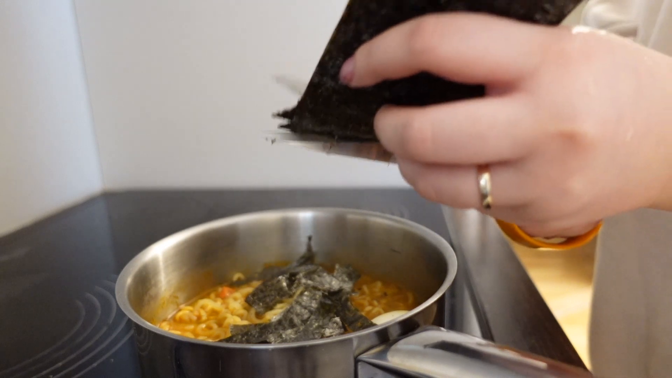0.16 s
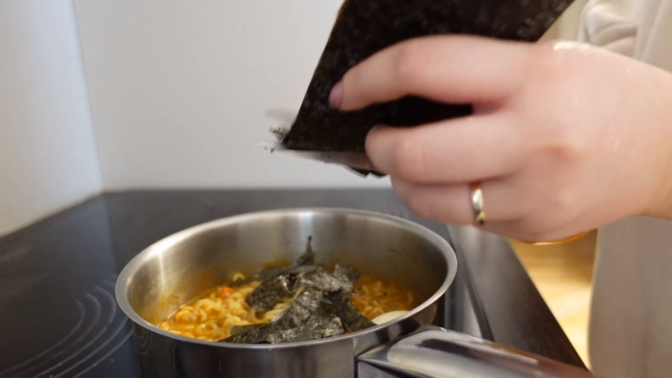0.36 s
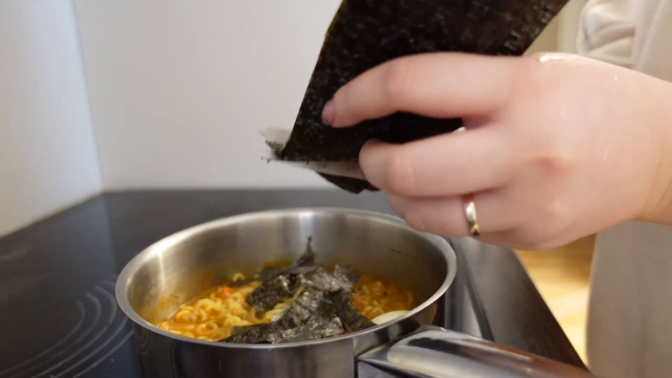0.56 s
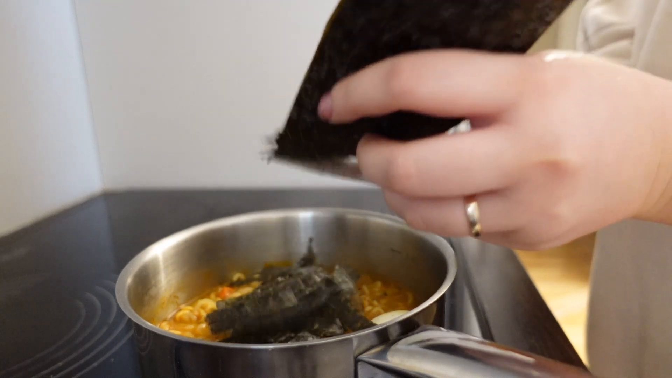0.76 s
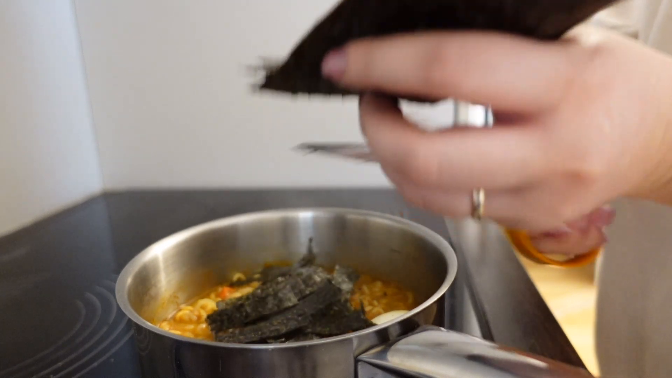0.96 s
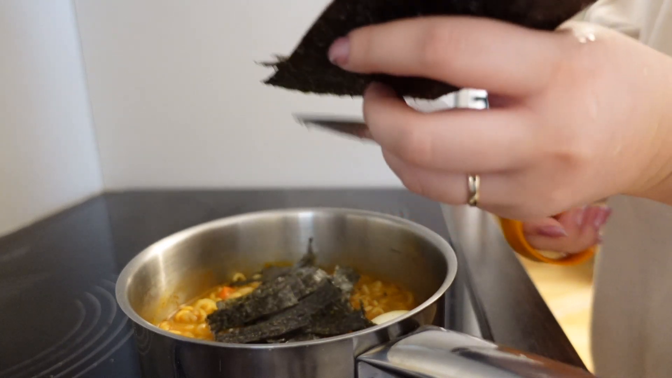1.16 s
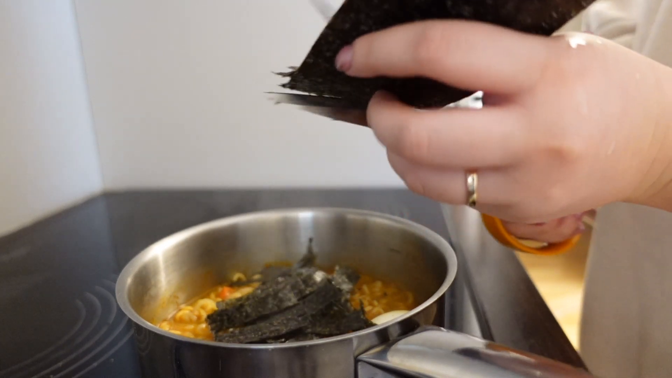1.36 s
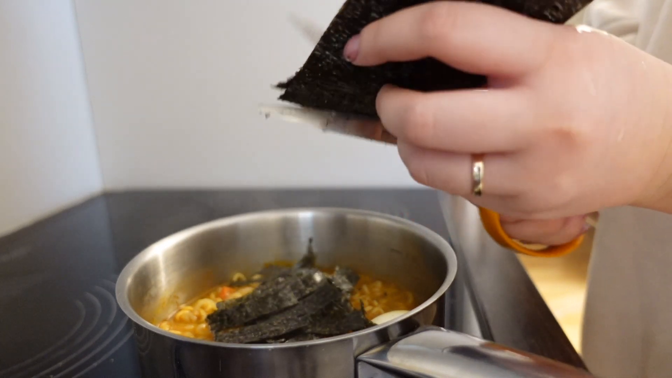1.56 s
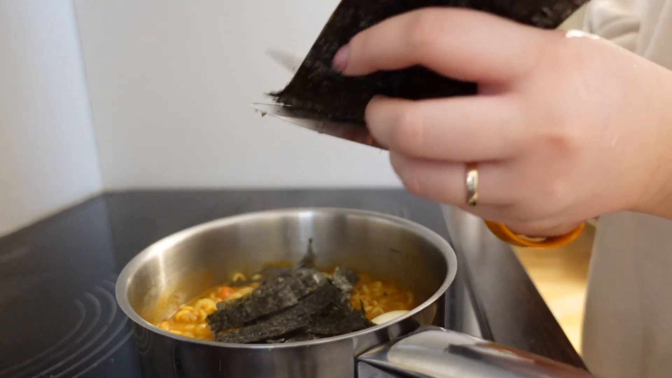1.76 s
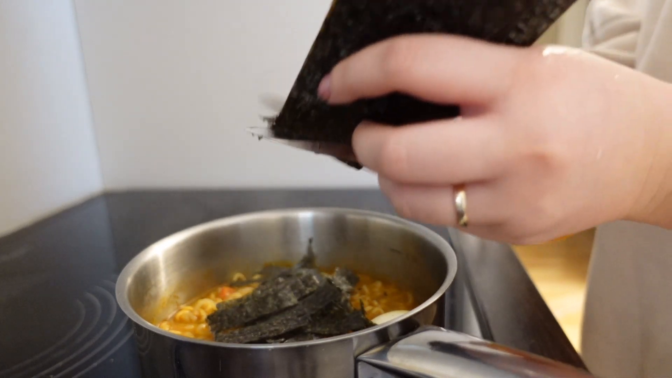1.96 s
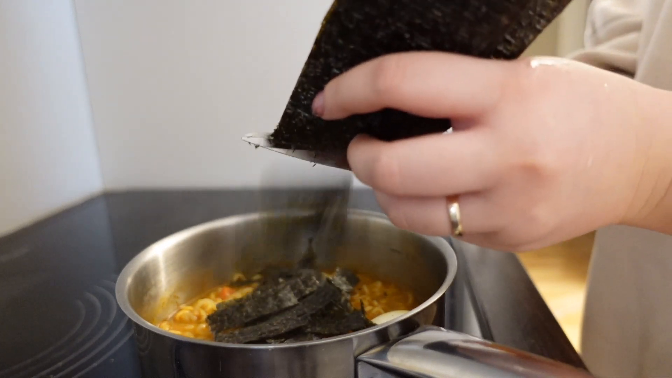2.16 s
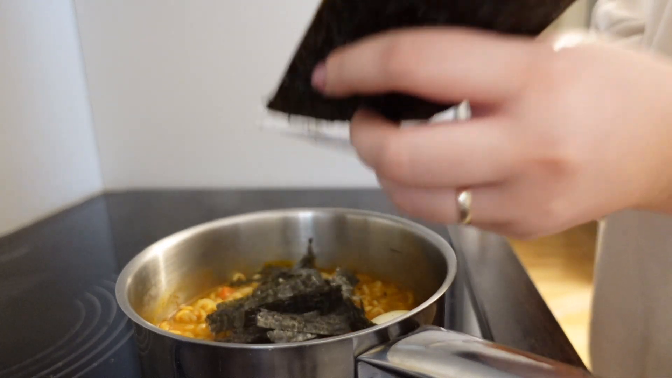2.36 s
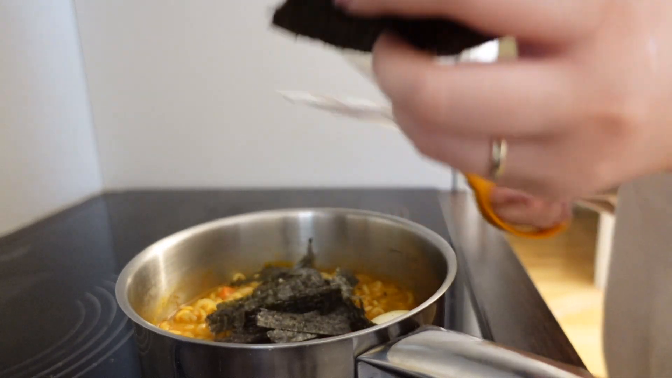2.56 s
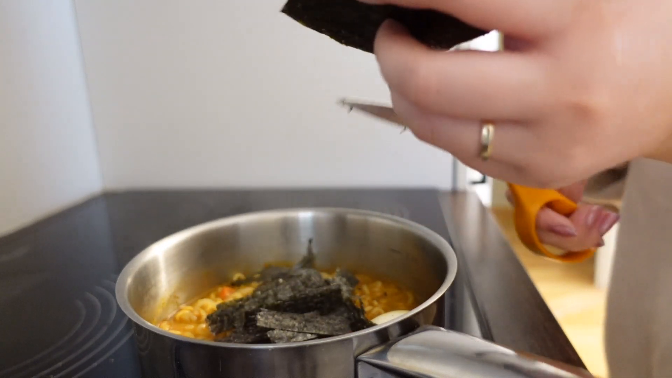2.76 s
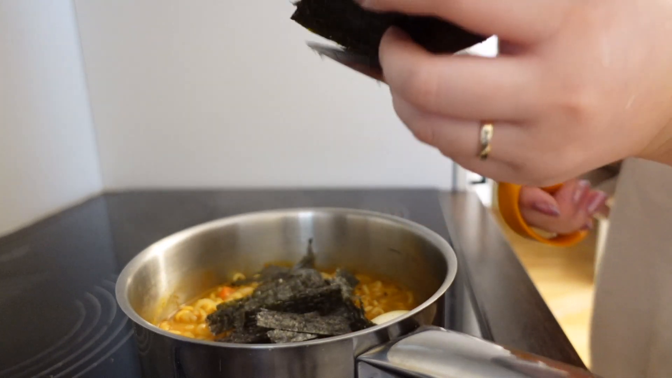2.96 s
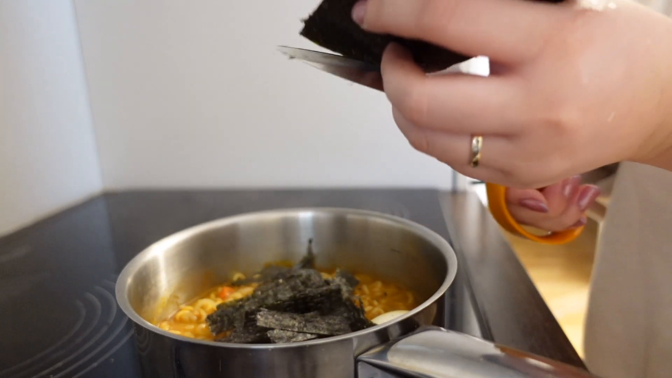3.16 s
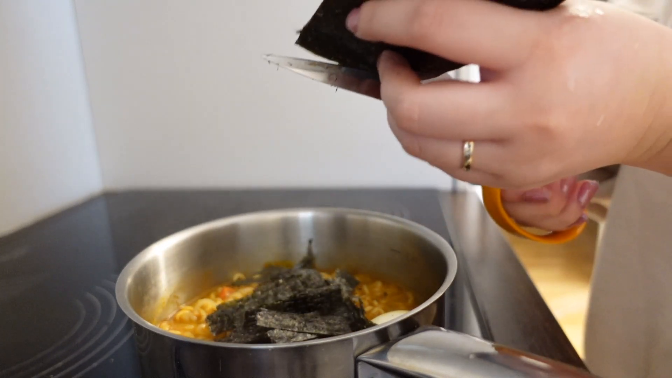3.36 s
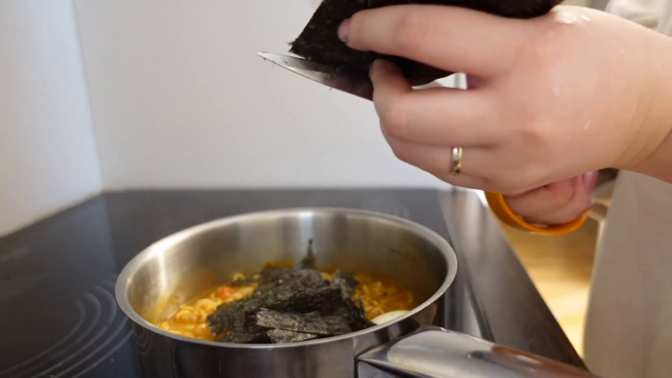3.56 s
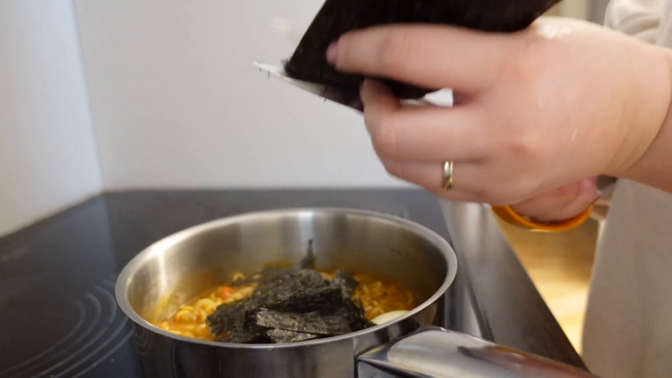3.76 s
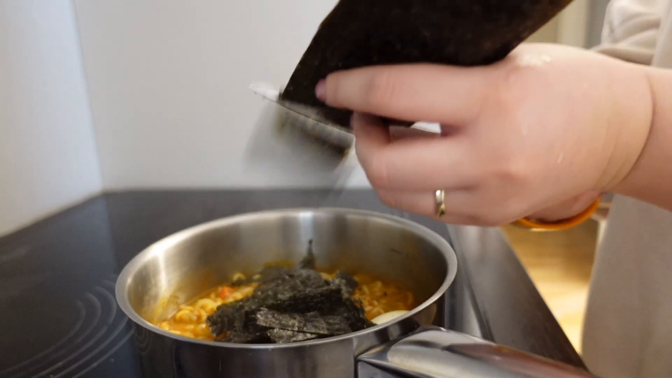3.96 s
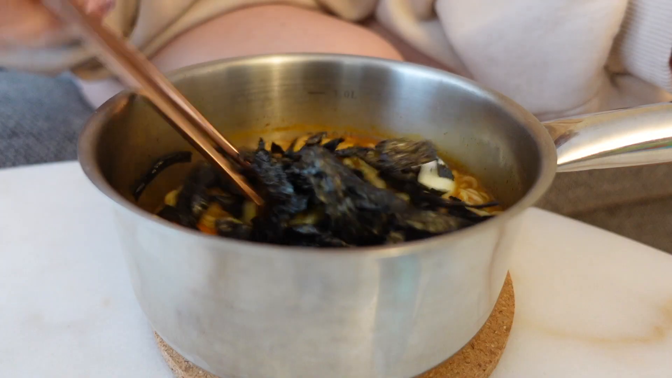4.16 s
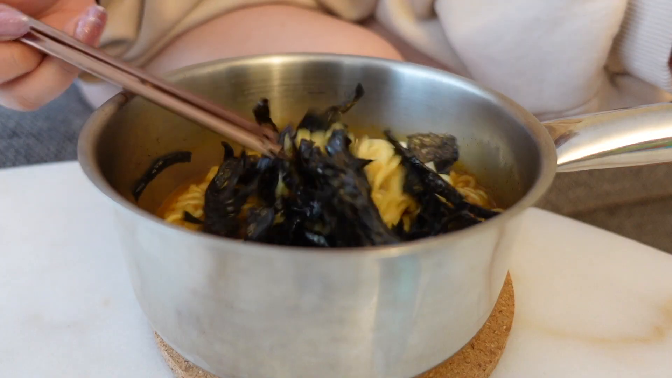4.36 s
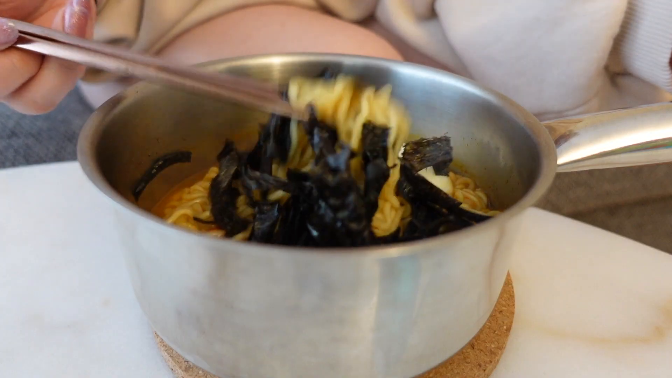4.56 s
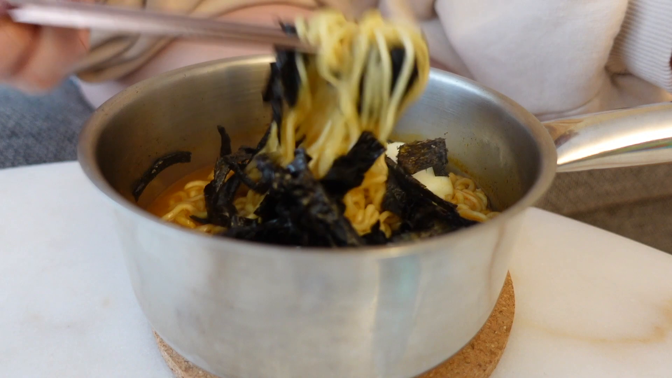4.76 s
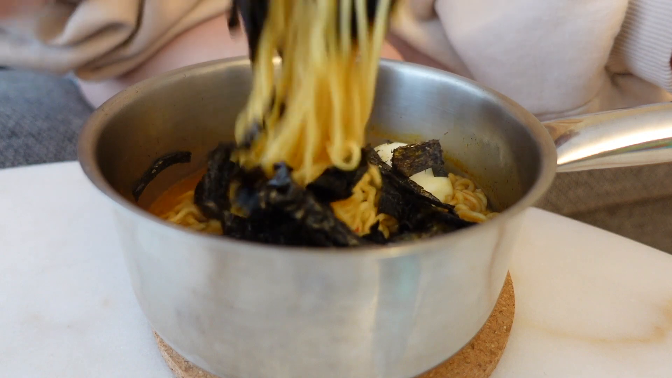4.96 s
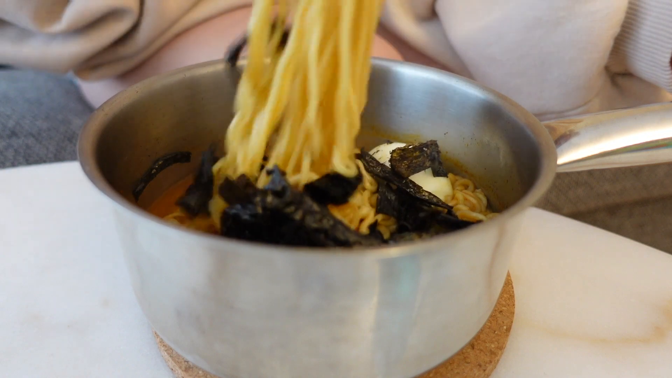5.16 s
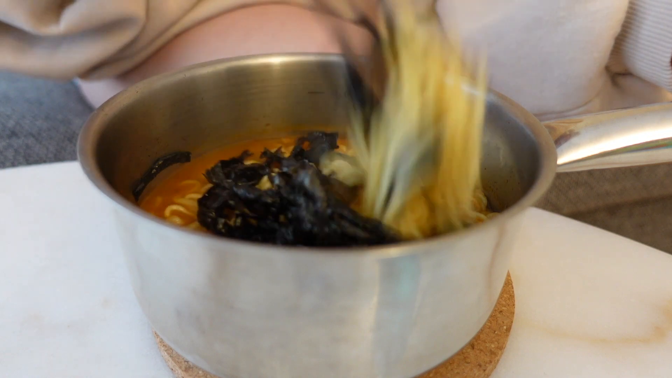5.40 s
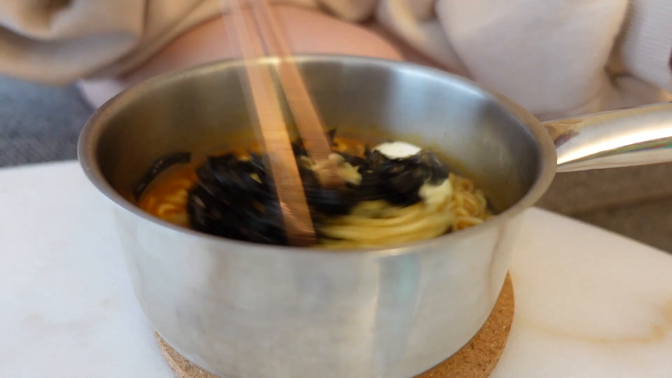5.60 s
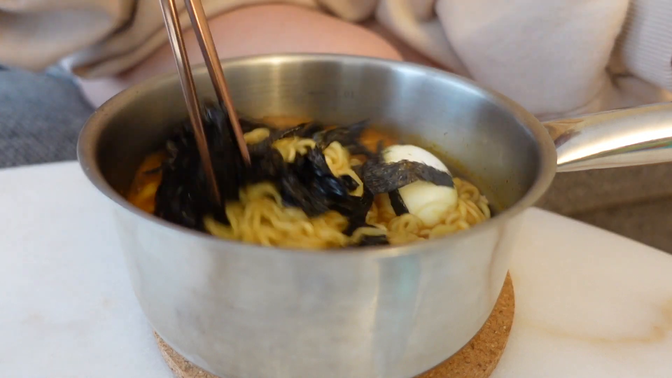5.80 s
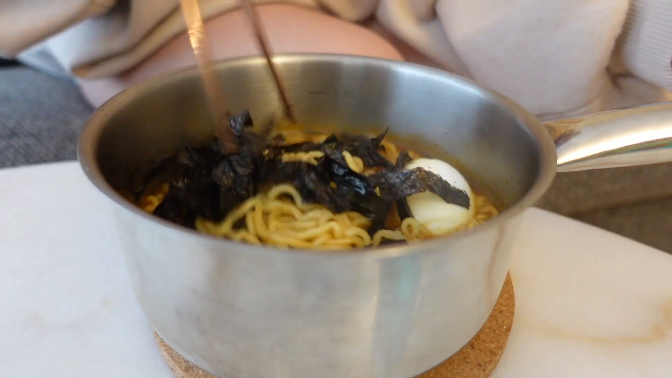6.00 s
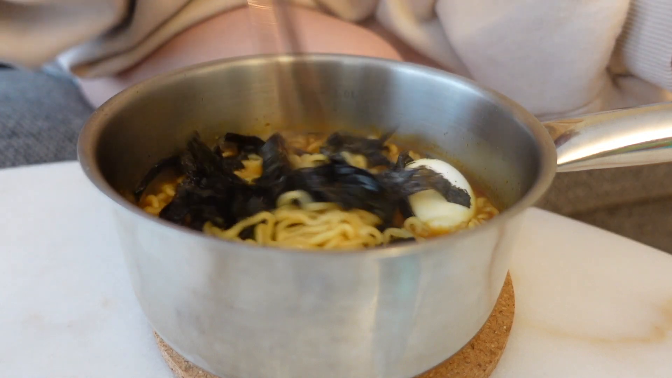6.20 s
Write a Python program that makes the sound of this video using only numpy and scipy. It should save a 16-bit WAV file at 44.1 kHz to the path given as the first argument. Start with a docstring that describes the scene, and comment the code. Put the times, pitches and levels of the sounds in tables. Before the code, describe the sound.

Scissors cut a crisp sheet of dried seaweed in three crackling strokes, then an abrupt change to wet noodles stirred with chopsticks in a steel pot.

```python
"""A fan-toned room noise and a hum come first, as a sheet of dried seaweed rustles in the hand in a small kitchen.
Scissors cut it in three strokes close to the microphone: avalanches of tiny fractures and single brittle snaps,
with stick-slip scrapes and rustling between strokes. At 4.12 s the scene changes abruptly to a table:
wet noodles slide as streams of resonant grains and part in ticks, chopsticks clink on a steel pot that rings
in its modes, and bubbles gulp and pop as damped sines. Scattered echoes and a faint tail surround both places."""
import sys
import numpy as np
from scipy import signal
from scipy.fft import rfft, irfft
from scipy.io import wavfile
from scipy.ndimage import uniform_filter1d

SR = 44100
rng = np.random.default_rng(int(sys.argv[2]) if len(sys.argv) > 2 else 0)


def wav_record(signal):
    """Record a signal, one row per channel, as 16-bit PCM in the file named by sys.argv[1]."""
    frames = np.transpose(np.atleast_2d(signal))
    bounded = np.clip(frames, -1, 1)
    # unit amplitude maps onto the largest positive 16-bit level
    quanta = np.round(bounded * 32767).astype(np.int16)
    wavfile.write(sys.argv[1], SR, quanta)


N = 275007
TIME = np.arange(N) / SR
BINS = np.fft.rfftfreq(1024, 1 / SR)


def amp(db):
    """Logarithmic level: decibels to amplitude gain."""
    return 10 ** (np.asarray(db) / 20)


def evened(x):
    """Normalization of power: scales to rms 1."""
    return x / np.sqrt(np.mean(x ** 2) + 1e-20)


def read(points, hz):
    """Logarithmic pitch scale: interpolates a spectrum or other curve over log frequency."""
    f, value = np.transpose(points)
    return np.interp(np.log(hz + 1), np.log(f + 1), value)


def add(mix, s, sound):
    """Superposition: mixes a sound in at time s."""
    part = mix[max(round(s * SR), 0):][:len(sound)]
    part += sound[:len(part)]


def humps(modes, hz):
    """Resonance: broad modes as bumps in dB."""
    return sum(db / (1 + (2 * (hz - f) / width) ** 2) for f, width, db in modes)


def shelves(body_db, edge_db, body_hz=2400, edge_hz=7000):
    """Spectral tilt: lifts the low end (body) and the high end (edge) of a spectrum, in dB."""
    body = body_db / (1 + (BINS / body_hz) ** 4)
    edge = edge_db / (1 + (edge_hz / (BINS + 1)) ** 4)
    return body + edge


def ripple(size=14):
    """Individual resonance: random peaks and dips, since every flake has resonances of its own."""
    return evened(uniform_filter1d(rng.standard_normal(len(BINS)), size))


def impulse(db):
    """Minimum phase: the causal click of energy 1 whose spectrum has this shape."""
    log_gain = np.log(amp(np.r_[db, db[-2:0:-1]]))
    click = np.fft.ifft(np.exp(np.conj(signal.hilbert(log_gain)))).real
    return click / np.linalg.norm(click)


def crackle(count, per_s, spread_db):
    """Crackling noise: random clicks of rms 1, many small and a few large."""
    size = amp(spread_db * np.minimum(rng.exponential(1, count), 4))
    sign = rng.choice([-1, 1], count)
    happens = rng.random(count) < per_s / SR
    return evened(size * sign * happens)


# likeness of the left and right room noise: hz (Hz), correlation (0 to 1)
AIR_LIKENESS = [(30, 0.67), (100, 0.74), (250, 0.63), (1000, 0.61), (4000, 0.56), (16000, 1)]


def air(colour, db, drone):
    """Partly coherent stationary noise: filtered room noise with the resonance of a distant fan."""
    hz = np.fft.rfftfreq(N, 1 / SR)
    a, b = rfft(rng.standard_normal((2, N)))
    same = np.clip(read(AIR_LIKENESS, hz), -1, 1)
    pair = np.array([a, same * a + np.sqrt(1 - same ** 2) * b])
    gain = amp(read(colour, hz) + humps(drone, hz))
    return amp(db) * evened(irfft(pair * gain, N))


# spectrum of the room noise at the hob: hz (Hz), relative level_db (dB per Hz)
HOB_AIR = [(15, -40.5), (25, -25.5), (102, -2), (293, 3.5), (439, -3), (575, 3.5), (714, -2.5), (1070, 1),
           (1330, -6.5), (2050, -3.5), (2990, -9.5), (5000, -20), (5430, -35.5), (10400, -38),
           (16000, -27.5)]


def hob_air(rms_db=-58):
    """Resonant noise: the air at the hob, with three humps (Hz, width Hz, dB)."""
    return air(HOB_AIR, rms_db, [(191, 50, 4.8), (1090, 130, 5.6), (1680, 200, 8.1)])


def hum(hum_hz=101, rms_db=-76):
    """Pure tone: the steady mains hum."""
    return amp(rms_db) * np.sqrt(2) * np.sin(2 * np.pi * hum_hz * TIME)


# scissor strokes: bite_s (s), through_s (s), rubbing level_db before the rustle mix (dB),
# thin_db, the body the first tears lack (dB), edge_db, their extra edge (dB)
STROKES = [(0.067, 0.648, -34.5, 8, 2), (1.653, 2.16, -33.5, 15, 4.5), (3.564, 3.984, -35, 21.5, 13)]
PRESS_DB_PER_S, EASE_DB_PER_S, SETTLE_DB_PER_S = 139, 20, 47


def pressure():
    """Friction under load: blades rub harder until they bite, ease along the cut, then the sheet settles."""
    gain = np.zeros(N)
    for bite, through, db, *_ in STROKES:
        before, after = np.maximum(bite - TIME, 0), np.maximum(TIME - through, 0)
        along = np.clip(TIME - bite, 0, through - bite)
        gain += amp(db - PRESS_DB_PER_S * before - EASE_DB_PER_S * along - SETTLE_DB_PER_S * after)
    return gain


def level(moves, rise, fade, rest_db):
    """Power addition: hand movements swell, hold and die away above a resting level."""
    power = amp(rest_db) ** 2
    for s, length, db in moves:
        shape = np.clip((TIME - s) / rise, 0, 1) * np.exp(-np.maximum(TIME - s - length, 0) / fade)
        power = power + (amp(db) * shape) ** 2
    return np.sqrt(power)


def rubbing(gain, colour, per_s, spread_db, grain_db, count=12):
    """Granular friction: fine grains, each with a broad resonance, swelling with the movement."""
    out = np.zeros(N)
    for hz in np.geomspace(1800, 12000, count):
        grain = impulse(read(colour, BINS) + humps([(hz, hz / 3, grain_db)], BINS))
        out += signal.oaconvolve(crackle(N, per_s / count, spread_db), grain)[:N]
    return gain * evened(out)


# spectrum of the rubbing sheet: hz (Hz), relative level_db (dB per Hz)
RUB = [(40, -53), (200, -33.5), (900, -12.5), (1700, -6.5), (3000, -5.5), (4500, 2.5), (7000, 0.5),
       (10000, -2.5), (13000, -8.5), (16000, -12)]
# fingers shift their grip: start_s (s), length_s (s), level_db before the rustle mix (dB)
GRIPS = [(.87, 0.024, -43), (1.265, .07, -52.5), (1.385, 0.11, -45.5), (2.52, 0.25, -55),
         (2.71, 0.11, -53.5), (2.98, 0.17, -52), (3.155, 0.092, -45.5), (3.36, 0.045, -50)]
GRIP_RISE_S, GRIP_FADE_S = .025, 0.034
HELD_DB = -65  # the sheet never lies quite still in the hand; before the rustle mix


def rustle(slide_db=-3.0, flakes_db=-7):
    """Friction noise: the sheet hisses on blades and fingers, and brittle flakes crackle on top."""
    gain = np.hypot(pressure(), level(GRIPS, GRIP_RISE_S, GRIP_FADE_S, HELD_DB))
    slide = amp(slide_db) * rubbing(gain, RUB, per_s=9000, spread_db=5.5, grain_db=7)
    flakes = amp(flakes_db) * rubbing(gain, RUB, per_s=90, spread_db=4.2, grain_db=10)
    return slide + flakes


FREE_BODY_DB, FREE_EDGE_DB = 6, -2  # shelves of the last tear of a stroke


def tear_colour(s):
    """Changing radiation: tears are thin and sharp at the bite and fill out as the strip comes free."""
    bite, through, _, thin_db, edge_db = min(STROKES, key=lambda stroke: abs(s - stroke[0]))
    uncut = np.interp(s, [bite, through], [1, 0])
    return shelves(FREE_BODY_DB - thin_db * uncut, FREE_EDGE_DB + edge_db * uncut)


# the sheet gives way under the blades: start_s (s), length_s (s), level_db before the trim in tears (dB)
TEARS = [(0.072, 0.0073, -35), (0.108, 0.004, -23.5), (0.142, 0.023, -19.5), (0.186, 0.004, -22),
         (0.215, 0.0029, -24), (0.237, 0.017, -20.5), (0.3, 0.015, -22), (0.328, 0.008, -22),
         (0.35, 0.016, -21.5), (0.385, 0.014, -26.5), (0.441, 0.0078, -19), (0.476, 0.01, -27),
         (0.495, 0.0044, -22), (0.573, 0.0035, -26.5), (0.629, 0.012, -17.5), (1.692, 0.026, -22),
         (1.731, 0.0076, -19), (1.77, 0.0044, -21), (1.786, 0.0082, -23), (1.837, 0.004, -20),
         (1.897, 0.011, -24.5), (1.925, 0.015, -17.5), (1.972, 0.0048, -18.5), (2, 0.0026, -19),
         (2.031, 0.011, -19), (2.073, 0.0055, -20.5), (2.14, 0.012, -18.5), (3.454, 0.0064, -36),
         (3.587, 0.009, -27.5), (3.612, 0.011, -24), (3.636, 0.013, -22), (3.653, 0.035, -28.5),
         (3.708, 0.017, -21), (3.752, 0.005, -20.5), (3.788, 0.011, -18.5), (3.83, 0.0093, -18),
         (3.859, 0.01, -19.5), (3.928, 0.004, -15.5), (3.944, 0.015, -22.5), (3.971, 0.015, -20.5)]
# spectrum of a fracture in a tear: hz (Hz), relative level_db (dB per Hz)
CRACK = [(30, -67), (120, -44), (250, -35.5), (450, -24), (750, -9), (1500, -8), (2500, -1), (4500, 0),
         (7000, 1), (10000, -3.5), (13000, -8.5), (16000, -14)]
# resonances of sheet and blades: pitch_hz (Hz), width_hz (Hz), lift_db (dB)
SHEET_MODES = [(1019, 150, 3.5), (1566, 160, 4.9), (1810, 390, 3.65), (2720, 390, 4.5), (3700, 500, 2),
               (4210, 320, 2.4), (4950, 460, 4.2), (5880, 410, 2.2)]


def tears(per_s=3800, spread_db=3.5, rise=0.00091, fade=0.0075, flake_db=2.0, gain_db=-0.67):
    """Fracture avalanche: a crack runs through the sheet in tiny breaks, then dies away."""
    out, t = np.zeros(N), np.arange(SR // 10) / SR
    colour = read(CRACK, BINS) + humps(SHEET_MODES, BINS)
    for s, length, db in TEARS:
        shape = (1 - np.exp(-t / rise)) * np.exp(-np.maximum(t - length, 0) / fade)
        fractures = shape * crackle(len(t), per_s, spread_db)
        fractures *= np.linalg.norm(shape) / np.linalg.norm(fractures)
        click = impulse(colour + tear_colour(s) + flake_db * ripple())
        add(out, s, amp(db + gain_db) * signal.fftconvolve(fractures, click))
    return out


# time of the tick or snap against the tear's start; levels are relative to the tear's, before SNAP_DB
STRAIN_LEAD_S, STRAIN_OVER_TEAR_DB = 0.0042, -0.5  # the lead is scaled at random
BREAK_DELAY_S, BREAK_OVER_TEAR_DB = .004, 15.5
FOLLOW_PER_S, FOLLOW_OVER_TEAR_DB, FOLLOW_SPREAD_DB = 80, 14.5, 3.5


def snaps_in_tears(count=3):
    """Strain release: a tick as strain builds, the snap that breaks it, and up to count that may follow."""
    rows = []
    for s, length, db in TEARS:
        rows.append((s - STRAIN_LEAD_S * rng.uniform(0.4, 1.8), db + STRAIN_OVER_TEAR_DB))
        rows.append((s + BREAK_DELAY_S, db + BREAK_OVER_TEAR_DB))
        for chance, place, size in rng.random((count, 3)):
            if chance < FOLLOW_PER_S * length / count:
                follow_db = db + FOLLOW_OVER_TEAR_DB + FOLLOW_SPREAD_DB * (2 * size - 1)
                rows.append((s + BREAK_DELAY_S + place * length, follow_db))
    return rows


# brittle fractures that stand out: start_s (s), level_db, the peak before SNAP_DB (dB)
SNAPS = [(0.255, -3), (0.298, -10), (0.311, -5), (0.325, -1), (0.358, -3), (0.388, -1), (0.394, -5),
         (0.491, -4), (0.574, -12), (0.935, -31), (0.964, -35), (1.102, -35), (1.451, -15), (1.464, -22),
         (1.561, -26), (1.657, -12), (1.679, -12), (1.714, -4), (1.825, -6), (1.848, -2), (1.896, -1),
         (1.901, -2), (1.926, -3), (2.154, -4), (2.671, -29), (2.723, -24), (2.734, -25), (2.755, -22),
         (2.829, -32), (2.902, -35), (3.196, -28), (3.377, -24), (3.407, -27), (3.527, -18), (3.547, -15),
         (3.588, -5), (3.664, -2), (3.675, -3), (3.684, -4), (3.733, -4), (3.781, -4)]
# spectrum of a snap, lone or within a tear, thinner than a tear: hz (Hz), relative level_db (dB per Hz)
SNAP = [(50, -62.5), (400, -35), (900, -24), (1700, -10), (3500, -8), (4600, 4.5), (7000, 2), (10000, -2.5),
        (13000, -14), (16000, -20.5), (20000, -35.5)]
SNAP_DB = -2  # overall trim of every snap (dB)


def snaps(splinter=0.00041, splinter_db=-11, flake_db=4.0):
    """Brittle fracture: one sharp click, with splinters giving way just behind it."""
    out, t = np.zeros(N), np.arange(SR // 200) / SR
    colour = read(SNAP, BINS) + humps(SHEET_MODES, BINS)
    for s, db in SNAPS + snaps_in_tears():
        splinters = amp(splinter_db) * rng.standard_normal(len(t)) * np.exp(-t / splinter)
        fracture = (t == 0) + splinters
        click = np.convolve(fracture, impulse(colour + flake_db * ripple()))
        add(out, s, amp(db + SNAP_DB) * click / abs(click).max())
    return out


# the sheet drags on a blade as the scissors open or shift, and the scissors tick at pivot or handles (.735,
# 2.235, 2.553, 2.635): # start_s (s), length_s (s), level_db (dB), body_db, the low shelf (dB)
SCRAPES = [(.735, .008, -28.5, 9), (.835, .058, -38, -8), (2.235, .035, -41, 4), (2.445, .062, -39, -7),
           (2.553, .02, -48, 7), (2.635, .025, -47, 10), (3.07, .035, -50, 8), (3.48, .014, -41, -8),
           (4.068, .045, -39, 4)]
# spectrum of a scrape: hz (Hz), relative level_db (dB per Hz)
SCRAPE = [(50, -71), (700, -21.5), (1300, -11), (1750, -0.5), (2400, -1.5), (3200, -4), (3950, 0.5),
          (4600, -3), (7000, -5), (10000, -10.5), (13000, -19), (16000, -27.5)]


def scrapes(per_s=1800, spread_db=1.5, flake_db=3, edge_db=2, edge_per_body=0.43):
    """Stick-slip: the rough sheet catches and slips on steel, or the scissors' pivot and handles tick, in a
    short swell of fine grains."""
    out = np.zeros(N)
    for s, length, db, body_db in SCRAPES:
        count = max(int(length * SR), 256)
        tilt = shelves(body_db, edge_db - edge_per_body * body_db)
        click = impulse(read(SCRAPE, BINS) + tilt + flake_db * ripple(size=6))
        slips = signal.windows.tukey(count, .8) * crackle(count, per_s, spread_db)
        add(out, s, amp(db) * signal.fftconvolve(slips, click))
    return out


# spectrum of the room noise at the table: hz (Hz), relative level_db (dB per Hz)
TABLE_AIR = [(15, -68), (25, -43), (145, -6.5), (344, -6.5), (405, -10), (734, -6), (818, -10), (1100, -4),
             (1400, -12), (2050, -10.5), (2220, -17.5), (3430, -21), (7510, -35), (14800, -25.5),
             (16000, -37)]


def table_air(rms_db=-59.5):
    """Resonant noise: the air at the table, with one hump (Hz, width Hz, dB)."""
    return air(TABLE_AIR, rms_db, [(1080, 114, 7.5)])


# chopsticks push wet noodles over each other: start_s (s), length_s (s), level_db before the trim (dB)
STIRS = [(4.31, 0.061, -60.5), (4.57, .16, -66.5), (5.39, 0.15, -61), (5.52, 0.14, -54.5), (5.72, 0.2, -62),
         (6.075, 0.19, -52)]
# spectrum of wet noodles: hz (Hz), relative level_db (dB per Hz)
WET = [(40, -50), (200, -31), (900, -14), (1800, -3), (2800, -3), (4000, 0), (6500, -0.5), (9000, -3),
       (12000, -11.5), (16000, -19)]
STIR_RISE_S, STIR_FADE_S = .05, .1
HANGING_DB = -67.5  # hanging noodles keep sliding faintly; before the trim


def noodles(trim_db=-0.5):
    """Wet friction: pushed noodles slide over each other in a stream of grains."""
    gain = level(STIRS, STIR_RISE_S, STIR_FADE_S, HANGING_DB)
    return amp(trim_db) * rubbing(gain, WET, per_s=3000, spread_db=4, grain_db=6)


def strands(rms_db=-72):
    """Adhesion: sticky noodles part in faint, sparse ticks."""
    return rubbing(amp(rms_db), WET, per_s=90, spread_db=3.2, grain_db=10)


# chopsticks touch the pot: start_s (s), level_db, the tick's peak (dB), edge_db, its high shelf (dB),
# steel_db, relative ring of the steel (dB)
CLINKS = [(4.2762, -16, 1, 0), (4.2775, -16, 1, 0), (4.403, -42, -8, -6), (4.409, -43, -8, -6),
          (5.497, -26, 10, -26), (5.979, -45, 5, -3), (6.009, -39, 7, -8), (6.186, -32, -8, -5),
          (6.194, -32, -8, -5)]
# spectrum of a chopstick's dry tick: hz (Hz), relative level_db (dB per Hz)
STICK = [(40, -72.5), (300, -31), (1200, -17), (2600, -15), (4000, -2.5), (4500, -19), (5400, 2),
         (6500, -22.5), (7800, -5.5), (8800, -7.5), (9500, -17), (10700, -7.5), (12000, -26),
         (16000, -38.5)]
# modes of the pot: pitch_hz (Hz), relative level_db (dB), t60_s (s)
POT = [(1066, -37, .2), (1257, -28, .14), (1520, -34, .2), (1880, -32, .25), (3880, -35, .2),
       (3987, -34, .25), (4815, -12, .12), (5270, -37, .22), (5620, -38, .22), (7817, -38, .2),
       (8735, -30, .25), (8860, -35, .25), (9870, -30, .07), (10720, -42, .25)]


def clinks(contact=0.0026, tick_db=0, ring_db=-4):
    """Modal excitation: a chopstick chatters briefly on the rim, and the steel rings on."""
    out, t = np.zeros(N), np.arange(SR // 2) / SR
    for s, db, edge_db, steel_db in CLINKS:
        chatter = rng.standard_normal(len(t)) * np.exp(-t / contact)
        tick = signal.fftconvolve(chatter, impulse(read(STICK, BINS) + shelves(0, edge_db)))[:len(t)]
        tick /= abs(tick).max()
        ring = sum(amp(mode_db - 60 * t / t60) * np.sin(2 * np.pi * hz * t) for hz, mode_db, t60 in POT)
        ring *= 1 - np.exp(-t / contact)  # the ring builds up during the contact
        add(out, s, amp(db) * (amp(tick_db) * tick + amp(steel_db + ring_db) * ring))
    return out


def bubbles(rows, cycles, glide):
    """Bubble resonance: a damped sine swells and decays over some cycles while its pitch creeps up."""
    out, t = np.zeros(N), np.arange(SR // 6) / SR
    for s, db, hz in rows:
        age = t * hz / cycles
        envelope = age * np.exp(1 - age)
        add(out, s, amp(db) * envelope * np.sin(2 * np.pi * hz * t * (1 + glide * age)))
    return out


# air pockets gulp in the broth: start_s, cluster centre (s), level_db, peak per bubble (dB),
# pitch_hz, cluster centre (Hz)
GULPS = [(4.36, -62, 720), (4.42, -62, 590), (4.45, -60, 500), (4.555, -62, 510), (4.635, -64, 550),
         (5.545, -60, 540), (5.572, -58, 510), (5.678, -61, 510)]


def gulps(count=6):
    """Entrained air: a small cluster of quickly damped bubbles of about one size."""
    rows = []
    for s, db, hz in GULPS:
        late, pitch = rng.uniform(-1.1, 1, (2, count))
        rows += zip(s + .02 * late, np.full(count, db), hz * (1 + .1 * pitch))
    return bubbles(rows, cycles=1.9, glide=.005)


# films of broth pop: start_s (s), level_db, envelope peak (dB), pitch_hz, initial (Hz)
POPS = [(4.587, -54, 7000), (4.604, -44, 2890), (4.679, -39.5, 7800), (4.703, -57, 6000),
        (4.742, -45.5, 6500), (4.888, -43, 6880), (5.309, -46.5, 5250), (5.336, -45.5, 4480),
        (5.405, -45, 4130), (5.543, -51, 7900), (5.566, -37, 5530), (5.741, -34.5, 3800),
        (5.903, -45, 6000), (5.965, -40, 3960), (6.089, -37.5, 3900)]


def pops():
    """Film rupture: each bursting film of broth gives one very short damped sine."""
    return bubbles(POPS, cycles=0.65, glide=.01)


# scattered echoes off nearby things: delay_s (s), relative level_db (dB)
ECHOES = [(.0006, 14), (.004, -4.5), (.0088, -13)]
# how long the kitchen rings: hz (Hz), t60_s (s)
ROOM_T60 = [(200, 0.56), (1000, 0.68), (2300, 0.58), (4500, 0.33), (9000, 0.18), (16000, 0.4)]
NEAR_SIDE_DB = -21  # how far the near echoes differ between the two microphone ports


def kitchen(x, near_db, near_t60, tail_db, near_side_db, width=0.079):
    """Scattering and reverberation: hand, pot and hob echo within milliseconds; walls add a faint tail."""
    t = np.arange(SR * 2 // 3) / SR
    taps = rng.choice([-1., 1.], (4, len(t))) * (rng.random((4, len(t))) < 5000 / SR)
    near = taps[2:] * sum(amp(db - 60 * abs(t - delay) / near_t60) * (t > delay) for delay, db in ECHOES)
    near /= np.linalg.norm(near, axis=1, keepdims=True)
    hz, when, z = signal.stft(taps[:2] * (t > .01), SR, nperseg=256)
    decay = amp(-60 * when / read(ROOM_T60, hz)[:, None])
    tail = signal.istft(z * decay, SR, nperseg=256)[1][:, :len(t)]
    tail /= np.linalg.norm(tail[0])
    # the two microphone ports are close together, so they hear nearly the same echoes
    mid = amp(near_db) * near[0] + amp(tail_db) * tail[0]
    side = amp(near_side_db) * near[1] + amp(tail_db) * width * tail[1]
    echoes = np.array([mid + side, mid - side])
    return x + signal.fftconvolve(x[None], echoes, axes=1)[:, :N]


def at_hob():
    """Superposition in a room: the cutting with its echoes, over a faint fan and mains hum."""
    seaweed = tears() + snaps() + scrapes() + rustle()
    echoed = kitchen(seaweed, near_db=-6.5, near_t60=0.038, tail_db=-14.5, near_side_db=NEAR_SIDE_DB)
    return echoed + hob_air() + hum()


def at_table():
    """Direct-to-reverberant balance: the stirring, a little farther from the microphone."""
    meal = clinks() + noodles() + strands() + pops() + gulps()
    echoed = kitchen(meal, near_db=-9.5, near_t60=0.0084, tail_db=-8.0, near_side_db=NEAR_SIDE_DB)
    return echoed + table_air()


def scene(table_from_s=4.12):
    """Linear crossfade: cutting at the hob, then an abrupt 4 ms change to stirring at the table."""
    change = np.clip((TIME - table_from_s) / .004, 0, 1)
    return (1 - change) * at_hob() + change * at_table()


def record(dry, edge_hz=15950):
    """Band limitation: a linear-phase low-pass filter removes the highest treble."""
    lowpass = signal.firwin(401, edge_hz, window=("kaiser", 8), fs=SR)
    return signal.oaconvolve(dry, lowpass[None], "same")


dry = scene()
out = record(dry)
wav_record(out)
```